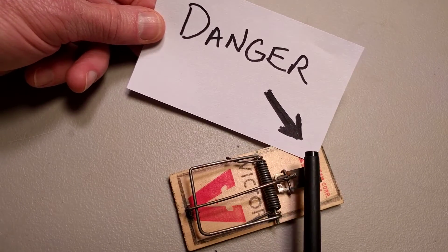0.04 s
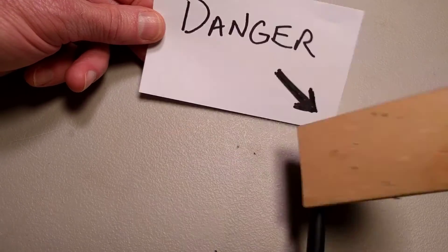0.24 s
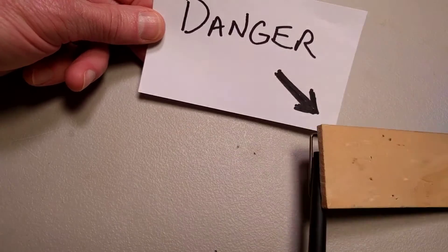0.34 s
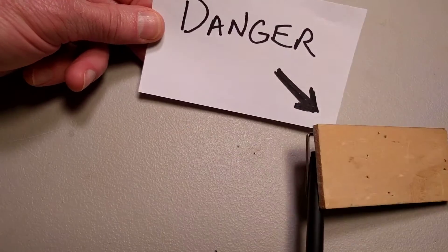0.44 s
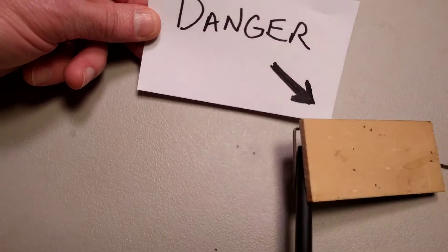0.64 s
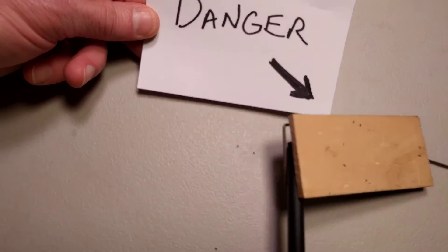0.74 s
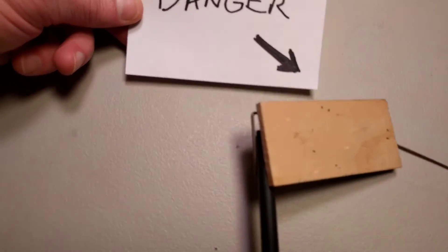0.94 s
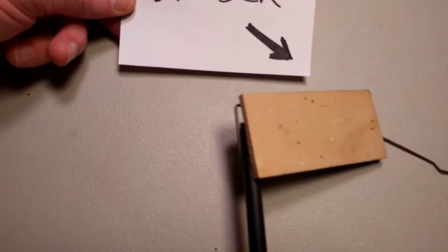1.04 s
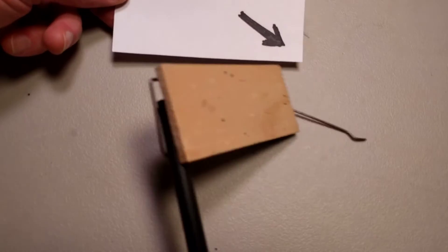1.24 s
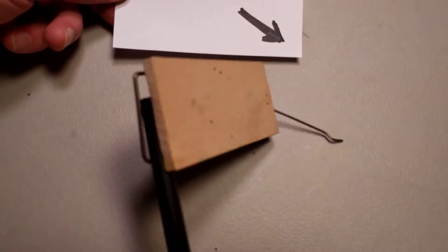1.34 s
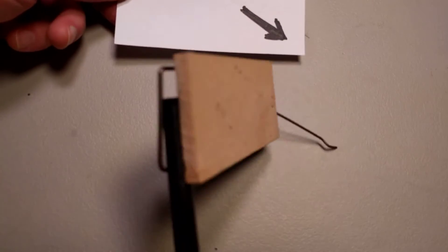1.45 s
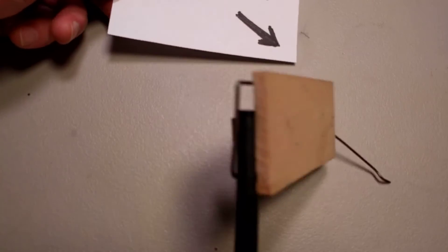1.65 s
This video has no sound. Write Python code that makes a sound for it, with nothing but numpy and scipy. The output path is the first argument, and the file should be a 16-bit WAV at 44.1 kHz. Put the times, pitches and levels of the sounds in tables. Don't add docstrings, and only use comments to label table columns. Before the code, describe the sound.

A mousetrap snaps after near silence: at 0.2 s the bar cracks onto a stick, a dense, distorted burst with bright metallic ringing. Wire jangles; the board knocks loudly at 0.41 s, with smaller clacks at 0.46 and 0.55-0.6 s. From 0.8 s faint wire ticks and dragging, stick-slip wooden creaks at 1.1-1.25 s, low table rumble, and a brighter rustle near 1.65 s. Close microphone, small room, faint fluctuating hum.

```python
import sys
import numpy as np
from scipy import signal
from scipy.fft import rfft, irfft
from scipy.io import wavfile

SR = 44100
rng = np.random.default_rng(int(sys.argv[2]) if len(sys.argv) > 2 else 0)


def output_pcm(signal):
    pcm = np.clip(np.atleast_2d(signal).T, -1, 1) * 32767
    wavfile.write(sys.argv[1], SR, np.round(pcm).astype(np.int16))


def undo_db(level):
    steps = np.asarray(level, float) / 20
    return 10 ** steps


N = 74970

# t/s, level/dB, brightest f/Hz, buzz/s, crack/dB
SLAM = [
    (0.2039, -25.5, 337, 0.01, -7),
    (0.2118, -15.5, 6400, 0.0014, -20),
    (0.2147, -11.5, 4970, 0.0028, 10.5),
    (.217, 4, 3970, 0.0071, -10.5),
    (.218, -5, 1000, 0.0076, -19),
    (.222, 3, 5400, 0.0063, -2),
    (.231, 4, 7200, 0.0046, -6.5),
    (.248, -11, 5740, .005, -10),
]
# f/Hz, level/dB, t60/s
BOARD = [(230, 15.5, 0.015), (422, 7, 0.011), (595, 11.5, 0.0085), (1000, 2, 0.0097), (2200, -10.5, 0.01),
         (2577, 2.5, 0.014), (3190, 4.5, 0.0043), (3740, 2, 0.0051), (4385, 0, 0.0045), (4930, -1, 0.0082),
         (5664, 5, 0.0069), (6380, -0.5, 0.009), (7200, -25.5, 0.017), (9200, -8, 0.0065)]
# t/s, level/dB
TICKS = [(0.7954, -36.5), (.879, -39), (.8855, -30), (0.8899, -27.5), (.894, -28.5), (0.8974, -32.5),
         (.902, -38), (0.9779, -31.5), (0.983, -33), (1.0038, -31.5), (1.145, -32), (1.2421, -25.5),
         (1.2487, -24), (1.2552, -29.5), (1.2608, -38), (1.2866, -32.5), (1.2972, -33), (1.318, -30),
         (1.321, -31), (1.3243, -28.5), (1.335, -38), (1.35, -35.5), (1.36, -34), (1.406, -39),
         (1.656, -27), (1.6717, -23), (1.6885, -32), (1.692, -24), (1.696, -30)]
# t/s, edge level/dB, body level/dB
CREAKS = [(1.091, -44, -35.5), (1.109, -32.5, -35), (1.1165, -34.5, -32), (1.1424, -34, -48),
          (1.1535, -26.5, -32), (1.1612, -22, -27), (1.174, -24, -36), (1.1885, -19.5, -36),
          (1.1997, -16, -28), (1.2146, -21, -22.5), (1.2314, -25, -21), (1.244, -33, -34),
          (1.249, -31, -29), (1.2612, -45, -29)]
# t/s, f/Hz
RUB = [(.75, 6210), (1.27, 6040), (1.29, 4680), (1.425, 4470), (1.435, 6580), (1.675, 6900), (1.685, 5570)]


def evened(x):
    return x / np.sqrt(np.mean(x ** 2) + 1e-20)


def read(points, hz):
    f, value = np.transpose(points)
    return np.interp(np.log(hz + 1), np.log(f + 1), value)


def curve(rows, column):
    rows = np.array(rows)
    return np.interp(np.arange(N) / SR, rows[:, 0], rows[:, column])


def colour(x, points):
    gain = undo_db(read(points, np.fft.rfftfreq(len(x), 1 / SR)))
    return irfft(rfft(x) * gain, len(x))


def place(mix, s, sound):
    out, at = mix.copy(), round(s * SR)
    out[at:at + len(sound)] += sound[:N - at]
    return out


def rings(modes, focus_hz, fall_db, count=2600):
    damped_s, soft_s = 0.022, 0.000089
    t = np.arange(count) / SR
    hz, db, t60 = np.transpose(modes)[:, :, None]
    strike_db = db - fall_db * abs(np.log2(hz / focus_hz))
    decay_db = 60 * t / np.minimum(t60, damped_s)
    ringing = (undo_db(strike_db - decay_db) * np.sin(2 * np.pi * hz * t)).sum(0)
    return ringing * (1 - np.exp(-t / soft_s))


def ping(db, hz, rise_s):
    u = np.arange(round(12 * rise_s * SR) + 8) / SR / rise_s
    return undo_db(db) * u * np.exp(1 - u) * np.sin(2 * np.pi * hz * rise_s * u)


def grains(per_s, spread_db):
    chance, size = rng.random(N), rng.exponential(1, N)
    sign = rng.choice([-1., 1.], N)
    return (chance < per_s / SR) * sign * undo_db(spread_db * np.minimum(size, 5))


def resonate(x, hz, width_hz):
    turn = np.exp(2j * np.pi * np.cumsum(hz * np.ones(len(x))) / SR)
    r = np.exp(-np.pi * width_hz / SR)
    once = signal.lfilter([1 - r], [1, -r], x / turn)
    twice = signal.lfilter([1 - r], [1, -r], once)
    return evened((turn * twice).real)


def brighten(x, level_db, full_db):
    treble_hz, treble_growth = 7780, 0.94
    low = signal.sosfiltfilt(signal.butter(4, treble_hz, fs=SR, output="sos"), x)
    treble = undo_db(treble_growth * (level_db - full_db)) * (x - low)
    return undo_db(level_db) * (low + treble)


def knock(mix, s, db, focus_hz, buzz_s, crack_db):
    # f/Hz, level/dB per Hz
    crack_spectrum = [(100, -4.5), (980, 8), (1400, -20), (3200, -5.5), (7300, 3.5), (9500, -8.5),
                      (14000, -6.5), (16500, -7)]
    dull_db_per_oct, thin_db_per_oct = 2, 3.5
    t = np.arange(4096) / SR
    buzz = np.minimum(t / (0.24 * buzz_s + 1e-5), 1) * np.exp(-t / max(buzz_s, 5e-5))
    contact = rng.standard_normal(4096) * buzz
    ring = signal.fftconvolve(contact, rings(BOARD, focus_hz, 16))[:4096]
    tone = []
    for hz, level in crack_spectrum:
        dull = dull_db_per_oct * max(np.log2(hz / focus_hz), 0)
        thin = thin_db_per_oct * max(np.log2(focus_hz / hz), 0)
        tone.append((hz, level - dull - thin))
    crack = evened(colour(rng.standard_normal(4096), tone)) * buzz
    sound = ring / abs(ring).max() + undo_db(crack_db) * crack
    part = mix[round(s * SR):][:4096]
    part += undo_db(db) * sound[:len(part)]


def slam_and_bounces():
    # t/s, level/dB, brightest f/Hz, buzz/s, crack/dB
    bounces = [(0.1273, -51.5, 4600, 0.0028, -24), (0.129, -47, 244.3, 0.0071, -32),
               (.3885, -27, 2580, 0.0015, 5.5), (.408, 2, 3040, 0.0025, -2),
               (0.408, -5.5, 5500, 0.00036, -0.5), (0.4079, -4.5, 533, 0.0015, -14.5),
               (0.4252, -13.5, 5060, 0.0055, -3.5), (0.4635, -14.5, 6230, 0.0005, -8),
               (0.467, -10, 6400, 0.0013, -10.5), (0.5546, -7, 6340, 0.00073, -11),
               (0.5592, -15, 6100, 0.0011, -9), (.584, -18.5, 6000, 0.0026, -10),
               (.592, -16.5, 4840, 0.00031, -13.5), (0.6016, -22.5, 5900, 0.00068, -4)]
    mix = np.zeros(N)
    for row in [*SLAM, *bounces]:
        knock(mix, *row)
    return mix


def wire_ticks():
    rise_s = 0.00021
    mix = np.zeros(N)
    for s, db in TICKS:
        hz = np.interp(s, *np.transpose(RUB))
        mix = place(mix, s, ping(db, hz, rise_s) - ping(db - 11.5, hz * 0.72, rise_s))
    return mix


def creaks():
    # f/Hz, level/dB, t60/s
    edge_modes = [(2315, -0.5, 0.025), (2595, 4, 0.011), (2940, 1.5, 0.0054), (4220, 0.5, 0.0092),
                  (5030, -1, .003), (6400, -4, 0.011), (7800, -20, .003)]
    # f/Hz, level/dB, t60/s
    body_modes = [(305, -5, 0.027), (612, 3, .022), (813, -4, 0.017), (1000, -2.5, 0.018)]
    edge, body = rings(edge_modes, 2400, 0), rings(body_modes, 600, 0)
    edge, body = edge / abs(edge).max(), body / abs(body).max()
    mix = np.zeros(N)
    for s, edge_db, body_db in CREAKS:
        mix = place(mix, s, -undo_db(edge_db) * edge - undo_db(body_db) * body)
    return mix


def room(x):
    # f/Hz, t60/s
    decay = [(150, 0.1), (1000, 0.43), (4000, 0.66), (12000, 0.35)]
    taps = np.zeros(SR // 2)
    at = np.arange(200, SR // 2 - 20, 20)
    taps[at + rng.integers(0, 20, len(at))] = rng.choice([-1., 1.], len(at))
    hz, t, z = signal.stft(taps, SR, nperseg=256)
    tail = signal.istft(z * undo_db(-60 * t / read(decay, hz)[:, None]), SR, nperseg=256)[1]
    return signal.fftconvolve(x, tail / np.linalg.norm(tail))[:N]


def jangle():
    # t/s, level/dB
    jangle_level = [(.23, -18), (.27, -29), (.34, -25.5), (.4, -32), (.44, -27), (.5, -32.5), (.6, -35.5),
                    (.68, -47.5), (.77, -71.5)]
    # f/Hz, level/dB per Hz
    hiss_spectrum = [(88, -41.5), (150, -10.5), (618, -9.5), (972, -5), (1750, -15), (2260, -11), (5930, 0),
                     (15300, -32.5), (16500, -48)]
    t = np.arange(N) / SR
    clicks = evened(grains(6000, 1.124)) + 1.2 * rng.standard_normal(N)
    ring = evened(signal.fftconvolve(clicks, rings(BOARD, 6000, 4.1))[:N])
    hiss = evened(colour(clicks, hiss_spectrum))
    live = (t > jangle_level[0][0]) * undo_db(-200 * np.maximum(t - jangle_level[-1][0], 0))
    return live * brighten(undo_db(-0.5) * hiss + undo_db(-23.5) * ring, curve(jangle_level, 1), -29.5)


def pings_and_swells():
    # start t/s, peak level/dB, f/Hz, rise/s
    pings = [(.219, -4.5, 5280, 0.0021), (0.2203, -9, 3270, 0.0037), (.221, -25, 990, 0.0084),
             (0.215, -26, 344, 0.0078), (.218, -25, 452, 0.005), (.226, -33, 13800, 0.0014),
             (0.23, -7.5, 7310, 0.0029), (.255, -18, 7460, 0.0047), (0.2831, -10.5, 5850, 0.00051),
             (0.3435, -16.5, 7800, 0.0011), (0.3445, -8.5, 7020, 0.0007), (.389, -20, 2370, .0012),
             (0.3892, -17, 6230, .001), (0.4097, -10.5, 2466, 0.001), (.4095, -12, 6400, 0.0023),
             (0.4645, -1, 5800, 0.00021), (0.4647, -14.5, 2560, 0.00078), (.468, -22, 2560, 0.0011),
             (.5545, -25.5, 2500, 0.001), (.5845, -18.5, 6300, 0.00055), (1.249, -36, 8750, 0.0023),
             (1.323, -37.5, 6670, 0.0026), (1.641, -34, 2500, 0.0032), (1.647, -35, 3200, 0.0025),
             (1.647, -36, 6400, .0015), (1.655, -37, 985, 0.0041), (1.662, -31, 6500, 0.0028)]
    # start t/s, peak level/dB, f/Hz, rise/s
    low_swells = [(.225, -31.5, 116, .012), (.232, -41, 72, .01), (.205, -30.5, 211, 0.0097),
                  (0.311, -44, 62, 0.015), (0.408, -31.5, 111, 0.0093), (.407, -35, 70, 0.013),
                  (.455, -46, 212, .01), (.495, -36.5, 61.3, 0.016), (.51, -44, 214.5, 0.028),
                  (.565, -43.5, 64, .02), (0.666, -46.5, 62, .018), (.68, -44, 514, 0.0049),
                  (.865, -47, 499.6, 0.023), (.98, -45.5, 219, 0.016), (1.224, -44, 123, 0.01),
                  (1.231, -49, 59, 0.02), (1.291, -42, 67, 0.014), (1.35, -48.5, 214.8, 0.027),
                  (1.649, -46, 63.6, 0.017)]
    mix = np.zeros(N)
    for s, *row in [*pings, *low_swells]:
        mix = place(mix, s, ping(*row))
    return mix


def drag():
    # t/s, wire rustle level/dB, wood ring level/dB, rumble level/dB
    motion = [(.72, -90, -54.5, -63), (.8, -55, -66.5, -49.5), (.89, -47, -47, -41.5), (.93, -57, -63, -46),
              (1.0, -52.5, -57, -44.5), (1.07, -63.5, -96, -51), (1.16, -44.5, -36, -37.5),
              (1.25, -45, -56, -36.5), (1.32, -45, -48.5, -48.5), (1.42, -50.5, -51, -71),
              (1.47, -60.5, -63, -73.5), (1.545, -59.5, -63.5, -70.5), (1.573, -77.5, -87, -73),
              (1.583, -52.5, -55.5, -57), (1.62, -46.5, -45.5, -65), (1.668, -37, -33, -51),
              (1.68, -38, -37, -47.5), (1.7, -35, -48, -46)]
    # f/Hz, level/dB per Hz
    rustle_spectrum = [(1650, -42.5), (2800, -4), (5970, -6), (6430, -5), (7910, -15), (8650, -17.5),
                       (15400, -46.5), (16500, -51)]
    # f/Hz, level/dB, t60/s
    edge_modes = [(964, -7.5, .02), (2280, -5.5, 0.016), (2500, 1, 0.012), (3164, -2.5, 0.0062)]
    # f/Hz, level/dB per Hz
    rumble_spectrum = [(35, -52), (60, -9), (286, -3), (367, -7.5), (614, -6.5), (685, -10), (1490, -17),
                       (2500, -16), (3250, -29), (5500, -120)]
    clicks = evened(grains(4100, 5))
    rustle = evened(colour(clicks + 0.81 * rng.standard_normal(N), rustle_spectrum))
    rubbing = resonate(clicks, curve(RUB, 1), 1400)
    rustle = evened(rustle + undo_db(-9.5) * rubbing)
    edge = evened(signal.fftconvolve(clicks, rings(edge_modes, 2400, 0))[:N])
    bumps = evened(grains(900, 2.0)) + 0.73 * rng.standard_normal(N)
    rumble = evened(colour(bumps, rumble_spectrum))
    rumble = rumble + undo_db(-12) * resonate(bumps, 520, 164)
    rumble = evened(rumble + undo_db(-13.5) * resonate(bumps, 814, 99))
    live = np.arange(N) > SR * SLAM[2][0]
    wire = brighten(rustle, curve(motion, 1), -47.5)
    return live * (wire + undo_db(curve(motion, 2)) * edge + undo_db(curve(motion, 3)) * rumble)


def fizz():
    # f/Hz, level/dB per Hz
    grit = [(2000, -19), (4000, 8), (7000, -1.5), (9000, -9.5), (16000, -15)]
    puff = np.exp(-np.arange(600) / SR / 0.0016)
    level = np.zeros(N)
    for s, db in TICKS:
        level = place(level, s, undo_db(db - 12) * puff)
    for s, edge_db, _ in CREAKS:
        level = place(level, s, undo_db(edge_db - 11.5) * puff)
    return level * evened(colour(rng.standard_normal(N), grit))


def background():
    # f/Hz, level/dB
    hum_tones = [(61, -59), (121, -63), (212, -63.5)]
    # f/Hz, level/dB per Hz
    air_spectrum = [(18, -32.5), (30, -41), (76, -13.5), (276, -16.5), (409, -22), (506, -23), (1530, -26),
                    (15200, -39.5), (16500, -45)]
    # t/s, level/dB
    gate = [(0, -32), (.098, -27), (.103, -15), (.2, -11.5), (.23, 12), (.62, 8), (.76, -7), (1.1, -3),
            (1.27, 5.5), (1.55, -10), (1.7, 8.5)]
    t = np.arange(N) / SR
    hum = np.zeros(N)
    for hz, db in hum_tones:
        hum += undo_db(db) * np.sqrt(2) * np.sin(2 * np.pi * (hz * t + rng.random()))
    air = undo_db(-55.5) * evened(colour(rng.standard_normal(N), air_spectrum))
    return undo_db(curve(gate, 1)) * (hum + air)


def scene():
    hits = slam_and_bounces() + wire_ticks() + creaks()
    trap = hits + undo_db(-15) * room(hits) + jangle() + pings_and_swells()
    return (trap + drag() + fizz() + background())[None]


def low_pass(x):
    return signal.sosfilt(signal.butter(12, 16810, fs=SR, output="sos"), x)


def record(dry):
    clip = 0.6
    clipped = dry / (1 + abs(dry / clip) ** 6) ** (1 / 6)
    edge = signal.firwin(511, 15750, window=("kaiser", 9), fs=SR)[None]
    top = signal.firwin(511, 16800, window=("kaiser", 9), fs=SR)[None]
    above = clipped - signal.oaconvolve(clipped, edge, "same")
    limited = clipped - 0.9 * above
    limited = signal.oaconvolve(limited, top, "same")
    return low_pass(limited)


dry = scene()
out = record(dry)
output_pcm(out)
```